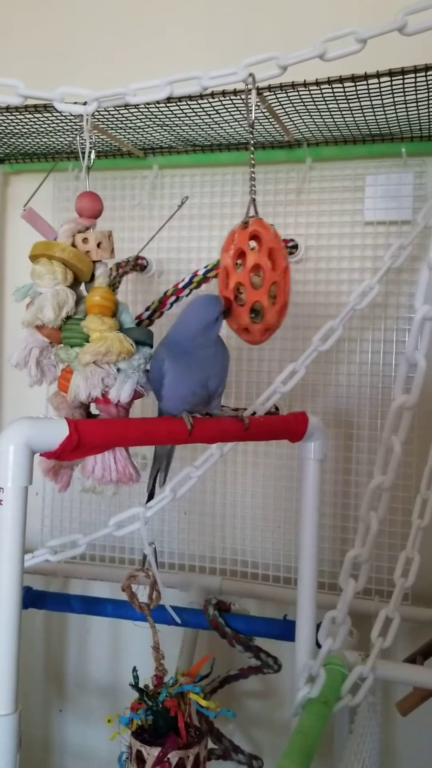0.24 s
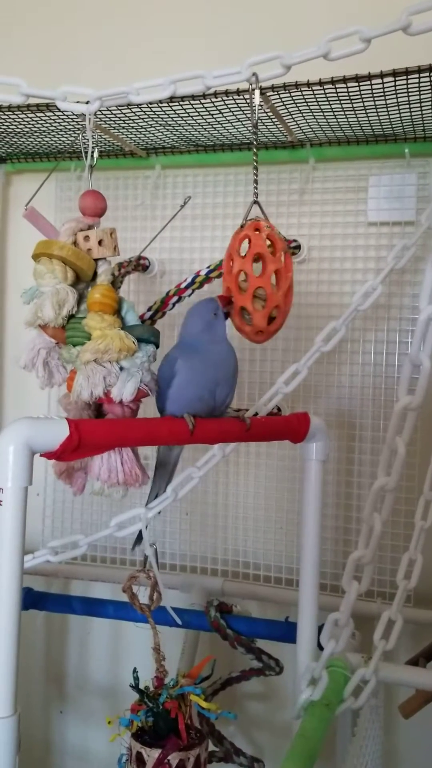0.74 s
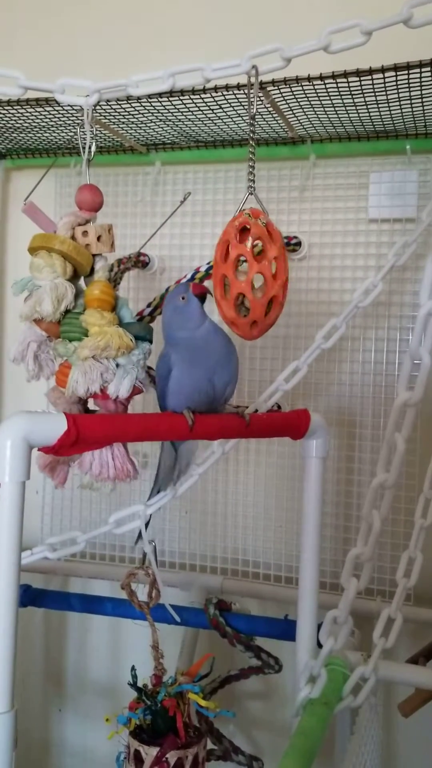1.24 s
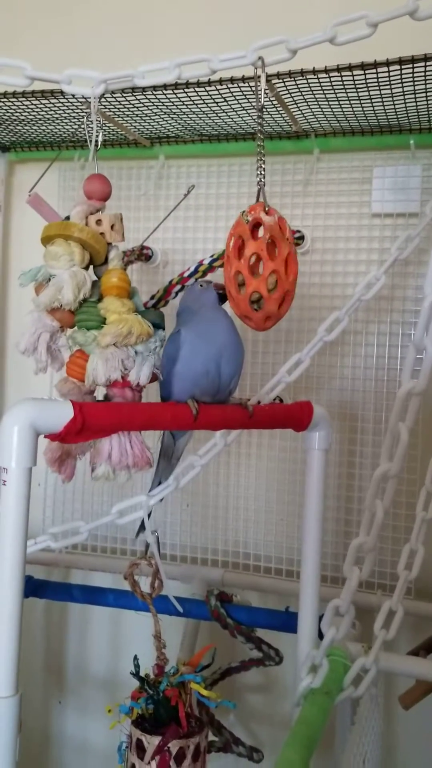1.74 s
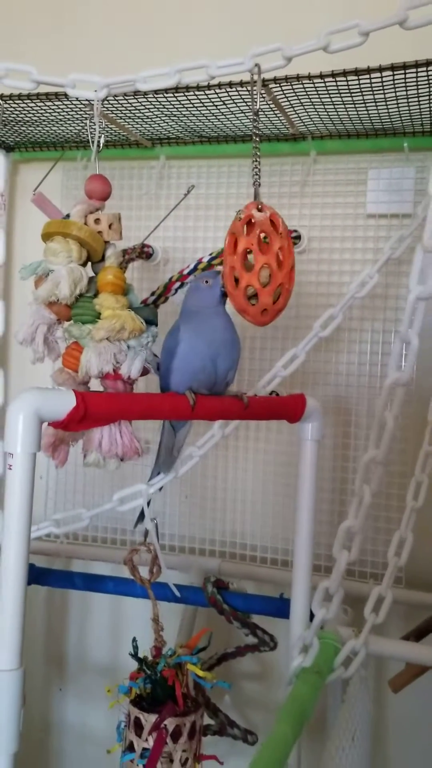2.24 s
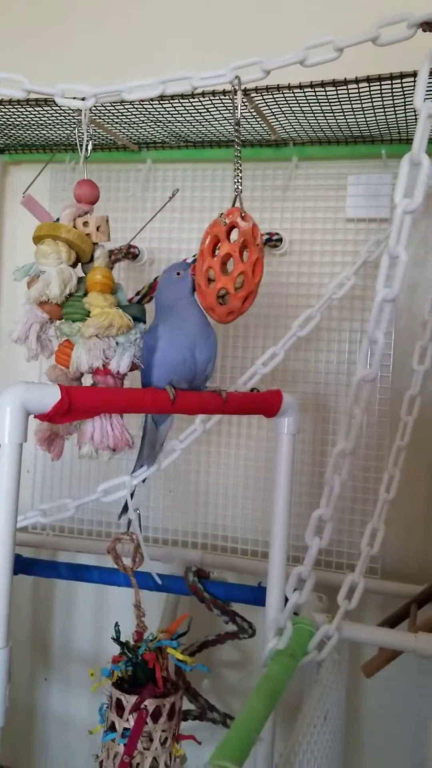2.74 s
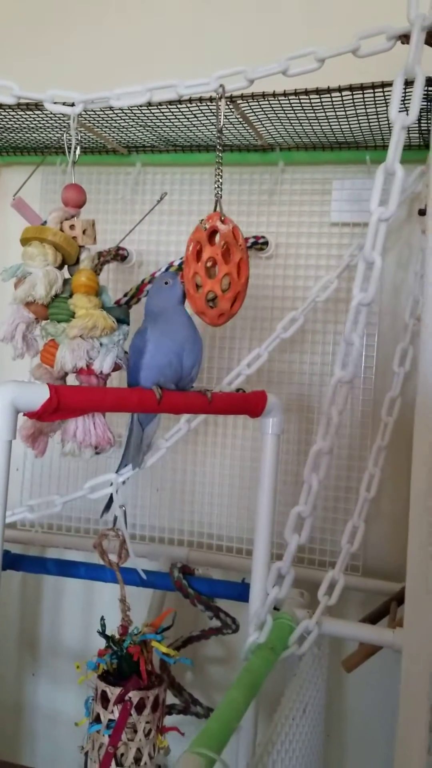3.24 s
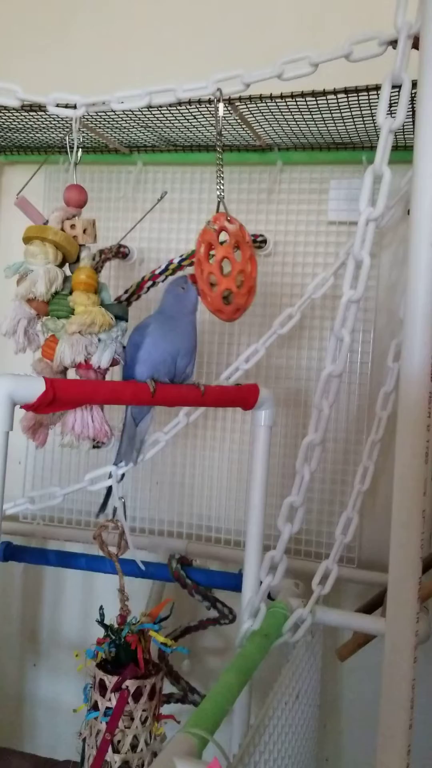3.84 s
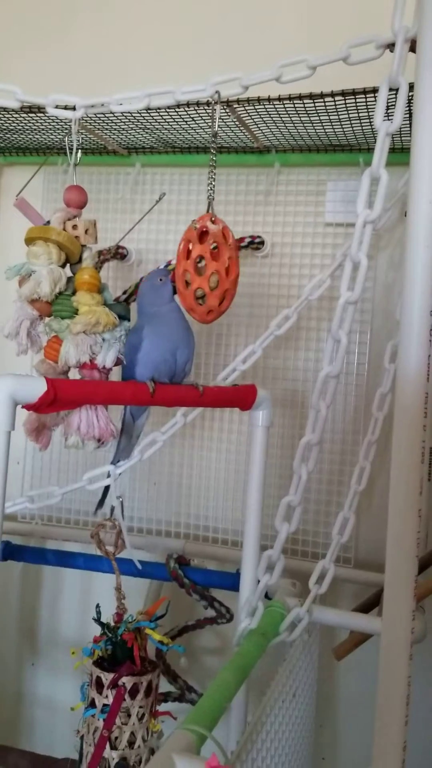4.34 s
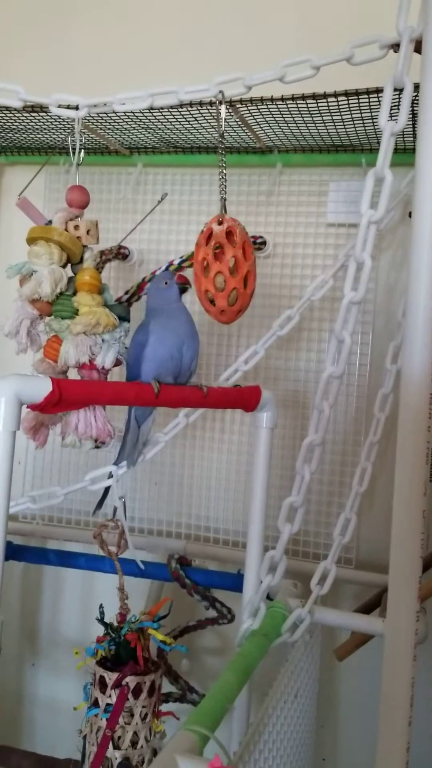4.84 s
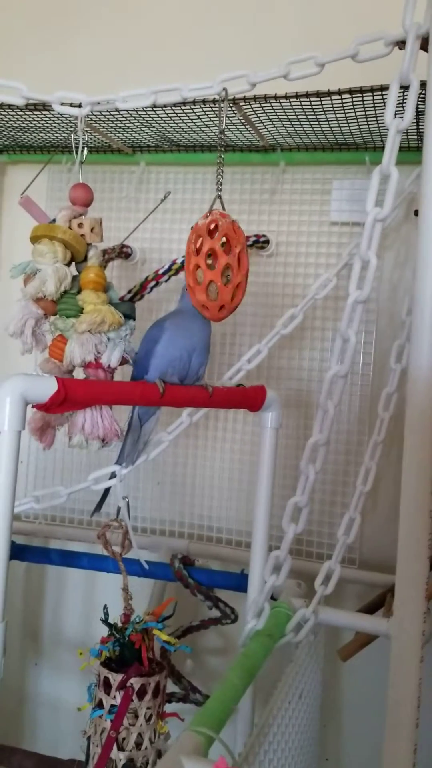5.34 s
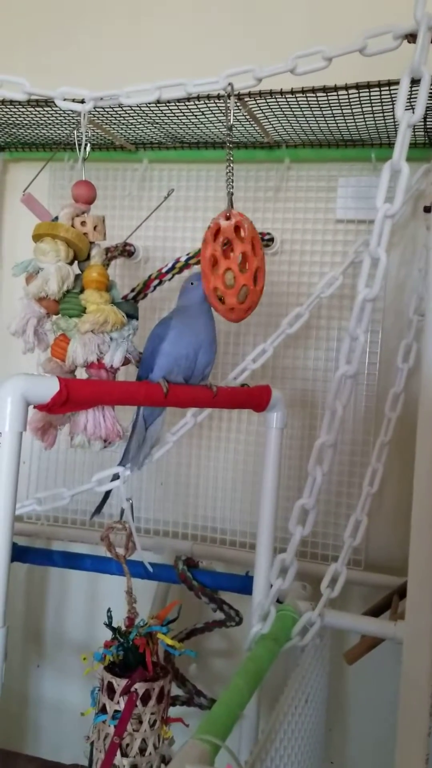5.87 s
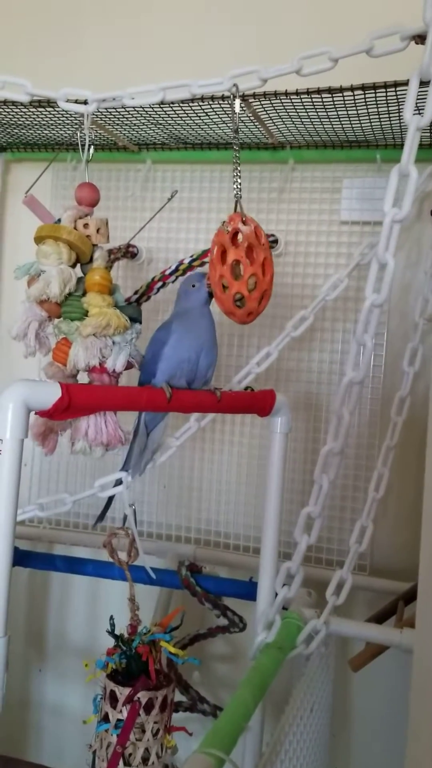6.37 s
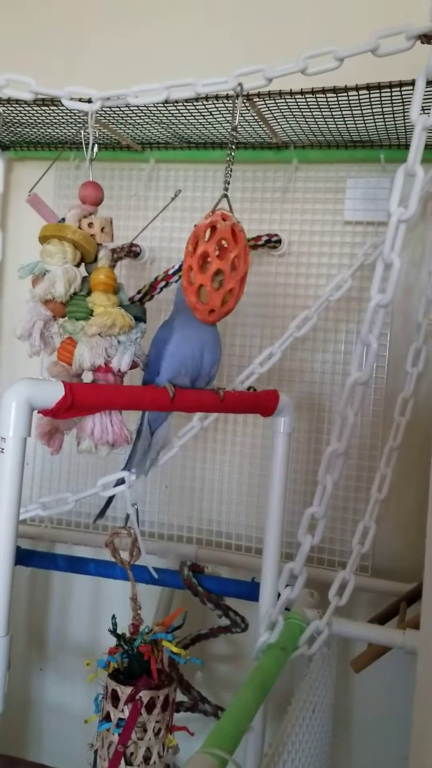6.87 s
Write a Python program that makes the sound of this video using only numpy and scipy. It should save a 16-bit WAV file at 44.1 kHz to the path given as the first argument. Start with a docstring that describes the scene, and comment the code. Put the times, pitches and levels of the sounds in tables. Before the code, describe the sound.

A small room with a short, bright echo, heard through a hand-held phone. Throughout there is a quiet low rumble, a wavering appliance hum, muffled engine drones, airy traffic rush and faint hiss. A parrot's beak touches a hollow plastic toy, a little to the left: light scrapes and taps at 0.2 and 0.6-0.8 s, then a stronger skid with a tiny squeak at 1.15 s, near soft, deep handling bumps. After a gap, faint nibbling starts around 2.3 s and sharp clicks crowd together from 2.5 to 2.9 s, loudest near 2.8. The outside rush swells gently around 3.4 s. More crisp clicks and short scrapes follow at 3.5-3.65 and 3.9-4.2 s. Then only sparse, weak ticks, with a small click near 6.1 s, until a last firm crunchy burst at 6.4-6.5 s. The background continues to about 7 s.

```python
"""A parrot nibbles and taps a hollow plastic toy that sways in a small room, in front of a hand-held phone.
An appliance hum (two wavering tones) and traffic (filtered noise, gliding tones) lie behind it throughout.
First come light taps and skids (slip pulses on damped modes), soft hand bumps (short sines) and at 1.15 s a
squeak; from 2.3 s faint nibbling and the loudest taps, as the rush outside swells once near 3.4 s.
After 4.2 s the contacts are weaker and sparser, until a last firm burst at 6.4 s."""
import sys
import numpy as np
from scipy import signal
from scipy.fft import rfft, irfft
from scipy.io import wavfile
from scipy.ndimage import uniform_filter1d

SR = 44100
rng = np.random.default_rng(int(sys.argv[2]) if len(sys.argv) > 2 else 0)


def dump(signal):
    """Clip the signal to [-1, 1] and save it as 16-bit WAV at the path in sys.argv[1]."""
    limited = np.clip(np.atleast_2d(signal).T, -1, 1)
    pcm = np.round(limited * 32767).astype(np.int16)
    wavfile.write(sys.argv[1], SR, pcm)


N = 313551
TIME = np.arange(N) / SR
CONTACT_SAMPLES = 8192
BINS_HZ = np.fft.rfftfreq(CONTACT_SAMPLES, 1 / SR) + 1  # 1 Hz up, to keep logs finite


def undb(db):
    """Decibels to gain."""
    return 10 ** (np.asarray(db) / 20)


def unit(x):
    """Scale to rms 1."""
    return x / np.sqrt(np.mean(x ** 2))


def walk(rate_hz):
    """Slow random drift with a spread near 1: held random values, smoothed twice."""
    hold = int(SR / rate_hz)
    steps = np.repeat(rng.standard_normal(N // hold + 1), hold)
    return 1.336 * uniform_filter1d(uniform_filter1d(steps, hold), hold)[:N]


def colour(x, points):
    """Filter by a spectrum of (Hz, dB) points, interpolated over log frequency."""
    hz, db = np.transpose(points)
    bins_hz = np.fft.rfftfreq(x.shape[-1], 1 / SR) + 1
    gain = undb(np.interp(np.log(bins_hz), np.log(hz), db))
    return irfft(rfft(x) * gain, x.shape[-1])


def add(out, start_s, x):
    """Mix x in at its start time."""
    i = max(int(start_s * SR), 0)
    out[i:i + len(x)] += x[:N - i]


def diffuse(points):
    """Far noise of a given spectrum at both microphones; the bass is the most alike in the two."""
    mid = unit(colour(rng.standard_normal(N), points))
    side = unit(colour(rng.standard_normal(N), points))
    side = colour(side, [(50, -12.5), (150, -17.0), (300, -8.0), (600, -7.5), (1500, -4.5)])
    return mid + side * np.array([[1], [-1]])


def microphone_hiss():
    """Coloured noise, independent at each microphone."""
    # Each row: frequency in Hz, relative level in dB.
    hiss_spectrum = [(1200, 3), (2600, -6.5), (4000, -7), (6000, -8.5), (8700, -11.5), (11500, -0.5),
                     (15000, 0.5), (15800, -11), (16200, -32)]
    return undb(-71.0) * unit(colour(rng.standard_normal((2, N)), hiss_spectrum))


def appliance_hum():
    """Tones that waver in pitch and level, throb together and grow slowly."""
    # Each row: pitch in Hz, relative level in dB.
    hum_tones = [(53.8, -57), (354.5, -70)]
    throb_period_s, throb_crest_s, throb_db, growth_db_per_s = 1.1, 1.56, 0.5, 0.03
    tones = np.zeros(N)
    for hz, db in hum_tones:
        phase = 2 * np.pi * np.cumsum(hz + 1.08 * walk(7.4)) / SR
        tones += undb(db + 1.6 * walk(5)) * np.sin(phase)
    drift_db = throb_db * np.cos(2 * np.pi * (TIME - throb_crest_s) / throb_period_s)
    drift_db += growth_db_per_s * (TIME - TIME.mean())
    return np.sqrt(2) * tones * undb(drift_db)


def traffic():
    """Low rumble of the building and street, and an airy rush that swells once as something goes by."""
    # Each row: frequency in Hz, relative level in dB.
    rumble_spectrum = [(12, -40), (20, -10), (48, 3), (124, -10.5), (241, -11), (314, -19.5), (353, -20.5),
                       (390, -24.5), (650, -36.5), (840, -95), (1430, -120)]
    # Rush as narrowed by the window. Each row: frequency in Hz, relative level in dB.
    rush_spectrum = [(320, -39), (550, -43), (630, -8), (677, -8), (781, 0), (839, 0), (1040, 5),
                     (1130, 0.5), (1220, 3.5), (1470, -8), (2600, -26.5), (3380, -25.5), (5720, -120)]
    # Each row: time in seconds, rumble level in dB before its flutter.
    rumble_levels = [(0, -49), (3.8, -50), (4.3, -50.5), (5.4, -49.5), (7.1, -51)]
    pass_s, pass_width_s, pass_db = 3.36, 0.31, 3.5
    rumble_db = np.interp(TIME, *np.transpose(rumble_levels)) + 1.47 * walk(5.457)
    rush_db = -64 + pass_db * np.exp(-((TIME - pass_s) / pass_width_s) ** 2) + 0.9 * walk(12)
    return diffuse(rumble_spectrum) * undb(rumble_db) + diffuse(rush_spectrum) * undb(rush_db)


def engines():
    """Far engines drone through the walls: tones that swell and sink as their pitch creeps."""
    # Each row: start in seconds, length in seconds, starting pitch in Hz, final pitch in Hz,
    # relative level in dB.
    drones = [(-0.2, 1.1, 118.6, 116.4, -60), (0.102, 0.56, 153, 139, -58), (-0.25, 1.17, 246, 256.7, -62),
              (0.026, 0.97, 232.2, 221.4, -66), (0.905, 1.13, 116, 121.5, -56.5),
              (1.352, 1.14, 267.8, 291, -63.5), (1.448, 1.08, 138, 143, -59),
              (1.904, 2.93, 99.4, 107, -60.5), (2.698, 0.98, 133, 136.8, -57),
              (3.647, 2.81, 139, 142.9, -58.5), (4.5, 2.0, 112, 117.9, -58), (5.8, 0.68, 117, 115.4, -57.5),
              (6.203, 1.17, 80.2, 91.1, -56), (6.547, 0.91, 118, 126.5, -54.5)]
    out = np.zeros(N)
    for start_s, length_s, start_hz, end_hz, db in drones:
        progress = np.clip((TIME - start_s) / length_s, 0, 1)
        pitch_hz = start_hz + (end_hz - start_hz) * progress + 3 * walk(30)
        swell = np.sqrt(np.abs(np.sin(np.pi * progress)))
        out += undb(db + 2.4 * walk(9)) * swell * np.sin(2 * np.pi * np.cumsum(pitch_hz) / SR)
    return np.sqrt(2) * out


def tyres():
    """Tyre noise of the nearest car: steady until it eases off, then fading as it draws away."""
    # Each row: frequency in Hz, relative level in dB.
    tyre_spectrum = [(100, -9), (230, 2.5), (320, -21), (600, -6), (900, -7), (1500, -7), (1900, -37),
                     (3000, -33)]
    ease_off_s, fade_db_per_s = 2.27, 10
    return undb(-68.5 - fade_db_per_s * np.maximum(TIME - ease_off_s, 0)) * diffuse(tyre_spectrum)


def background():
    """Traffic, engines and tyres outside, with the appliance's hum."""
    return traffic() + appliance_hum() + engines() + tyres()


def handling():
    """The hand nudges the phone: a few deep cycles under a half-sine swell each time."""
    # Each row: start in seconds, relative level in dB.
    bumps = [(1.02, -30), (1.085, -31.5), (1.164, -36.5), (1.923, -39), (2.982, -34.5)]
    bump_hz, bump_s = 45.4, 0.072
    t = np.arange(int(bump_s * SR)) / SR
    bump = np.sin(np.pi * t / bump_s) * np.sin(2 * np.pi * bump_hz * t)
    out = np.zeros(N)
    for start_s, db in bumps:
        add(out, start_s, undb(db) * bump)
    return out


def resonances(modes):
    """Gain of a set of damped modes (Hz, width Hz, dB), mean power 1."""
    power = 0
    for hz, width_hz, db in modes:
        detuning = (BINS_HZ / hz - hz / BINS_HZ) * hz / width_hz
        power = power + undb(2 * db) / (1 + detuning ** 2)
    return unit(np.sqrt(power))


def ring(force, gain):
    """Drive a body with a force whose overall spectrum is levelled; it rings only after the push."""
    push = rfft(force)
    trend = np.sqrt(uniform_filter1d(np.abs(push) ** 2, size=300))  # the fine roughness stays
    cepstrum = irfft(np.log(gain / trend + 1e-9))
    # folding the cepstrum makes the response causal (minimum phase)
    cepstrum[1:CONTACT_SAMPLES // 2] *= 2
    cepstrum[CONTACT_SAMPLES // 2 + 1:] = 0
    return irfft(push * np.exp(rfft(cepstrum)))[:CONTACT_SAMPLES * 3 // 4]


def slips(count, spread_db):
    """Tiny stick-slip pulses of either sign and uneven size; the grip limits the largest."""
    grip = np.minimum(rng.standard_normal(count), 3)
    return rng.choice([-1, 1], count) * undb(spread_db * grip)


def spot(body_db, middle_db, edge_db):
    """The toy's response at one point of contact; the beak's grip detunes each mode a little."""
    # Damped modes of the toy. Each row: pitch in Hz, width in Hz, level in dB.
    toy_modes = [(1120, 590, -13.5), (1970, 370, -10.5), (2900, 490, -13), (4250, 700, -5.5),
                 (4780, 600, -7.5), (5730, 650, -4.5), (6340, 250, -12), (6840, 320, -3.5),
                 (7570, 630, -1.5), (10500, 2900, -2.5), (13320, 3260, 3.5), (14900, 590, 2.5)]
    # Centres of body, middle, main ring and edge, in Hz.
    centres_hz = [3640, 4400, 7250, 11200]
    detune_share = 0.013
    modes = [(hz * (1 + detune_share * rng.standard_normal()), width_hz, db) for hz, width_hz, db in toy_modes]
    tilt_db = np.interp(np.log(BINS_HZ), np.log(centres_hz), [body_db, middle_db, 0, edge_db])
    return resonances(modes) * undb(tilt_db)


def shell(body_db, lift_db):
    """A contact that moves the whole shell is broad; a glancing one leaves mainly the main ring."""
    return spot(body_db, 0.44 * body_db + lift_db, 0.44 * body_db - 6)


def tap(contact_s):
    """Force of a tap: a hard first touch, then the beak's tip grinds to a stop in slips."""
    touch_share, touch_s = 0.58, 0.00009  # share of the energy
    t = np.arange(CONTACT_SAMPLES) / SR
    touch = unit(np.exp(-t / touch_s) * rng.standard_normal(CONTACT_SAMPLES))
    grind = unit(np.exp(-t / contact_s) * slips(CONTACT_SAMPLES, spread_db=1))
    return np.sqrt(touch_share) * touch + np.sqrt(1 - touch_share) * grind


def skid(length_s):
    """Force of a skid: a run of slips that swells and stops."""
    progress = np.minimum(np.arange(CONTACT_SAMPLES) / SR / length_s, 1)
    return slips(CONTACT_SAMPLES, spread_db=0.5) * np.sin(np.pi * progress)


def nibbling():
    """In each bout the beak rubs the plastic lightly and ticks on it at uneven moments."""
    # Each row: start in seconds, length in seconds (both at half fade), level of the rubbing in dB.
    nibbles = [(0.705, 0.059, -67.5), (2.29, 0.98, -73.5), (3.455, 0.84, -67), (5.204, 0.53, -77.5),
               (5.777, 1.0, -71)]
    # Each row: frequency in Hz, relative level in dB.
    rub_spectrum = [(1500, -36), (3400, -32), (4400, -6), (7500, 0.5), (9000, -9), (15000, -2)]
    # Body, middle and edge of a tick, in dB.
    tick_colour_db = (4, 9, -2)
    fade_s, ticks_per_s, tick_db, tick_spread_db = 0.19, 13, 32, 2

    effort = np.zeros(N)
    for start_s, length_s, db in nibbles:
        to_edge_s = np.minimum(TIME - start_s, start_s + length_s - TIME)
        effort += undb(db) * np.clip(to_edge_s / fade_s + .5, 0, 1)
    rubbing = slips(N, spread_db=11) * undb(3.5 * np.tanh(walk(14)))

    ticks, gain = np.zeros(N), spot(*tick_colour_db)
    for k in range(int(TIME[-1] * ticks_per_s) + 1):
        start_s = (k + rng.random()) / ticks_per_s
        level_db = tick_db + tick_spread_db * rng.standard_normal()
        if start_s < TIME[-1]:
            add(ticks, start_s, undb(level_db) * ring(tap(contact_s=0.00021), gain))
    return effort * (unit(colour(rubbing, rub_spectrum)) + ticks)


def taps():
    """Short crunches ring the toy; the spot that is touched decides which modes speak. A few rows, 5 to 8 ms
    after a loud tap, give that tap's sharp echo from the wall behind."""
    # Each row: start in seconds, level in dB, body (low modes of the shell) in dB, lift of the middle in dB,
    # contact time in seconds, favoured band in Hz, its boost in dB.
    tap_rows = [(0.204, -28, -11, -10, 0.0023, 7200, 0), (0.645, -24.5, -4.5, -6, 0.00078, 13300, 8),
                (0.775, -33, -4, -3, 0.00041, 13000, 8), (1.1553, -28, 4, 8, 0.00088, 3400, 17),
                (1.1625, -20, -2, -6, 0.0008, 3300, 8), (2.3018, -29, -10, -1, 0.00079, 6500, 2.5),
                (2.4852, -5.5, -16, -3, .0004, 13100, 11), (2.4918, -8.5, 2.5, -1, .0006, 7250, 5),
                (2.5325, -15, -2, -6, .00085, 7350, -1), (2.5762, -15.5, -13, -2, .0005, 13000, -1),
                (2.606, -21, -5, 0, .001, 7350, 2), (2.612, -26, -10, -1.5, .0005, 13000, 9),
                (2.666, -5, -10, -5, 0.0016, 13400, 4), (2.707, -24, -5, -2, .00033, 7350, 8),
                (2.715, -20, -5, 0, 0.0011, 13000, 10), (2.7357, -12.5, -12, -2, 0.00026, 13100, 5),
                (2.7764, 3.8, -21, -5, 0.00048, 13600, 2), (2.7819, -4, -16, -8, 0.00047, 7600, 6),
                (2.853, -10, -8.5, 3.5, 0.00019, 6900, 8.5), (3.0638, -18.5, -14.5, 8.5, .002, 6850, 1),
                (3.591, -7.5, -14.5, 0, 0.00036, 12000, 11.5), (3.5925, -21, -22, -5, .0008, 12500, 9),
                (3.608, -13.5, -15, -9, .0004, 7540, 6), (3.6204, -10, -7.5, -4, 0.00073, 7400, -1),
                (3.6522, -8.5, 1, -1.5, 0.000087, 7560, 0), (3.8747, -12.5, -5, 3, 0.00014, 13500, 13),
                (3.8764, -8, -3, 5.5, 0.00082, 6570, 10), (3.8823, -10.5, -10, -2, 0.00051, 5600, 6),
                (4.025, -5, -11, -2, .0002, 12500, 9.5), (4.027, -12, -12, 10, .0008, 6900, 3),
                (4.040, -1.3, -4, 1, 0.00034, 1010, 10), (4.0406, -14, -5, 1, 0.00068, 12500, 18.5),
                (4.0452, -16, -1, -5, 0.00034, 5500, 7), (4.1747, -30, -9, 0, .0002, 13000, 17),
                (4.2394, -20, -17, -3, .0001, 7200, -6), (4.27, -23.5, -12.5, 1, .0004, 7200, -7),
                (4.9645, -35, 13, 13, 0.045, 4300, -16), (5.2579, -39, 3, 5, .002, 13000, 3),
                (5.343, -36, -8, 3, .0005, 13000, 2), (5.7792, -26, -23, 2, .0004, 6800, 3),
                (5.8258, -31, -2, 6, 0.0039, 5230, 9), (5.9613, -30.5, -1, 11, 0.0018, 4500, 3),
                (6.04, -26.5, -2, 8, .0003, 5500, 5), (6.076, -13.5, -12.5, 0, 0.00026, 6740, -3.5),
                (6.3499, -36, -12, -9, .0005, 13000, 8), (6.405, -31, -6, 2, .0004, 13000, 3),
                (6.4203, -17.5, -9, 3.5, .0004, 4300, 5.5), (6.424, -19, 3, 2, .001, 4300, -8),
                (6.4414, -19, 7, 2.5, 0.00035, 4300, -2), (6.447, -28, 1, 2.5, .0005, 13000, 12),
                (6.5071, -8, 1.5, 0, 0.0016, 4370, 6), (6.513, -18, 4, 0, 0.001, 1950, 12),
                (6.518, -4, -2.5, 4, 0.00018, 12500, 8.5), (6.5182, -19, -4, 5, 0.00062, 4350, 11),
                (6.5228, -19, -4, 5, 0.00058, 4500, 6), (6.721, -29.5, -6, 3, .002, 4500, -3)]
    favour_octaves = 0.31
    out = np.zeros(N)
    for start_s, db, body_db, lift_db, contact_s, favoured_hz, boost_db in tap_rows:
        octaves = np.log2(BINS_HZ / favoured_hz)
        favour = undb(boost_db * np.exp(-(octaves / favour_octaves) ** 2))
        add(out, start_s, undb(db) * ring(tap(contact_s), favour * shell(body_db, lift_db)))
    return out


def skids():
    """The beak skids along the plastic: runs of slips ring the toy, and the loudest one also squeaks."""
    # Each row: start in seconds, length in seconds, level in dB, body in dB, lift of the middle in dB.
    skid_rows = [(0.196, 0.059, -23, -21, 0), (0.627, 0.017, -33, 2, -8), (0.742, 0.046, -33.5, 6, -3),
                 (1.151, 0.043, -8.5, -3, -2.5), (3.47, 0.096, -15.5, -22, -9), (3.935, 0.06, -22, -1, 2),
                 (4.007, 0.027, -18, -6, -2), (4.15, 0.018, -23.5, 2.5, 12),
                 (4.527, 0.0078, -35.5, -12, 12.5), (5.463, 0.02, -38, -12, 23), (5.71, 0.078, -38, 8, 11),
                 (6.415, 0.041, -17, -14, 8), (6.507, 0.016, -19, 11, 13.5)]
    # One squeak: start in seconds, length in seconds, level in dB.
    squeak = (1.152, 0.015, -19)
    # Each row: pitch in Hz, width in Hz, level in dB.
    squeak_modes = [(1490, 120, -9), (2380, 410, -8), (3240, 260, 0.5), (3440, 260, -3), (4400, 300, -9)]
    out = np.zeros(N)
    for start_s, length_s, db, body_db, lift_db in skid_rows:
        add(out, start_s, undb(db) * ring(skid(length_s), shell(body_db, lift_db)))
    start_s, length_s, db = squeak
    add(out, start_s, undb(db) * ring(skid(length_s), resonances(squeak_modes)))
    return out


def beak():
    """All contacts of the beak with the toy, without the room."""
    return taps() + skids() + nibbling()


def room(x, early_db, wall_db, tail_db):
    """Reflections at one microphone: scatter from the play stand, the wall behind it, the room's tail."""
    t = np.arange(int(.5 * SR)) / SR

    def cloud(envelope, spread_db=3):
        """Reflections of energy 1; with a wide spread, a few stand out."""
        h = slips(len(t), spread_db) * envelope
        return h / np.linalg.norm(h)

    def decay(start_s, t60_s):
        """An envelope that begins at its start time and falls 60 dB per t60_s."""
        return (t > start_s) * np.exp(-np.log(1000) * t / t60_s)

    def echoes():
        """The echo pattern for one position of the toy; treble dies sooner."""
        dark = colour(cloud(decay(start_s=0.0044, t60_s=0.37)),
                      [(2000, 8.5), (3300, 5.5), (5500, 0.0), (7500, -3.0), (11000, -17), (16000, -37)])
        bright = colour(cloud(decay(start_s=0.0026, t60_s=0.25)),
                        [(2000, 3.0), (7500, 0.5), (11000, 4.5), (16000, -5.5)])
        near = undb(early_db) * cloud(decay(start_s=0.00062, t60_s=0.022), spread_db=4.5)
        wall = undb(wall_db) * cloud(np.exp(-((t - .0068) / 0.0018) ** 2), spread_db=6)
        return near + wall + undb(tail_db) * (dark + bright)

    # the toy sways and twists, so the mix of four echo patterns keeps changing
    sway, twist = 2 * np.pi * .43 * TIME, 2 * np.pi * 1.37 * TIME
    shares = np.array([np.cos(sway), np.sin(sway), np.cos(twist), np.sin(twist)]) / np.sqrt(2)
    return sum(signal.oaconvolve(x * share, echoes())[:N] for share in shares)


def scene():
    """The toy is nearer the left microphone; the phone's body delays and shades the right one."""
    toy = beak()
    left = toy + room(toy, early_db=-4.5, wall_db=-3.0, tail_db=-2.0)
    lag_samples = 4
    shaded = colour(np.roll(toy, lag_samples), [(1000, 2.0), (4500, -9.0), (8000, -20), (13000, -6.0)])
    right_room = colour(room(toy, early_db=-4.5, wall_db=-20.0, tail_db=-4.0),
                        [(2000, -3.0), (5000, 0.0), (8000, -2.5), (12000, 0.5)])
    right = shaded + right_room
    surroundings = (background() + handling()) * undb([[1.3], [-1.5]])  # left, right
    return np.array([left, right]) + surroundings + microphone_hiss()


def record(dry):
    """The phone cuts the top: a steep low-pass at 16 kHz."""
    return signal.sosfilt(signal.ellip(8, .2, 70, 16000, fs=SR, output="sos"), dry)


dry = scene()
out = record(dry)
dump(out)
```